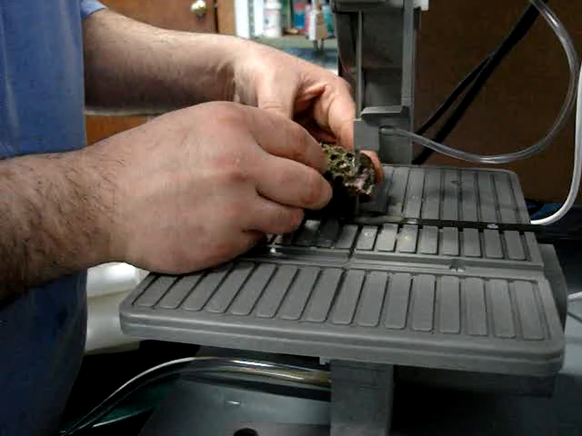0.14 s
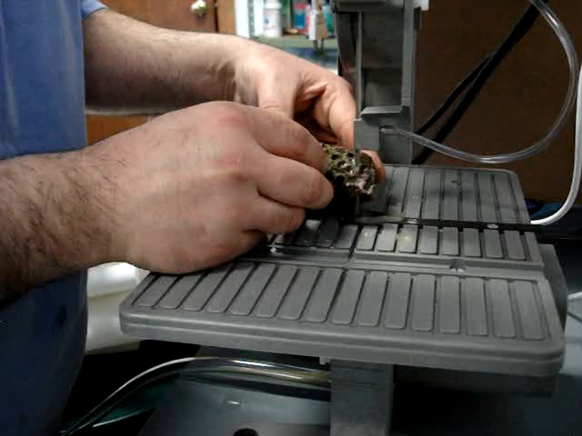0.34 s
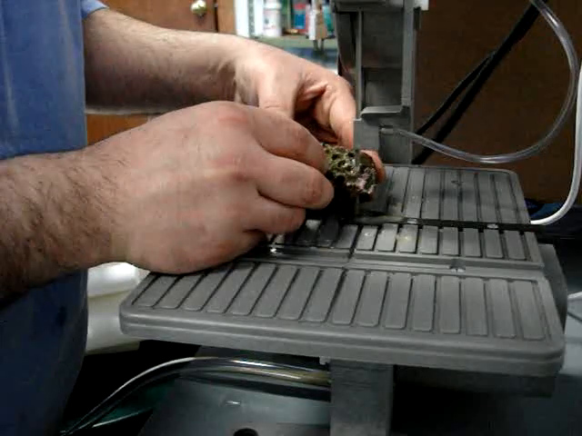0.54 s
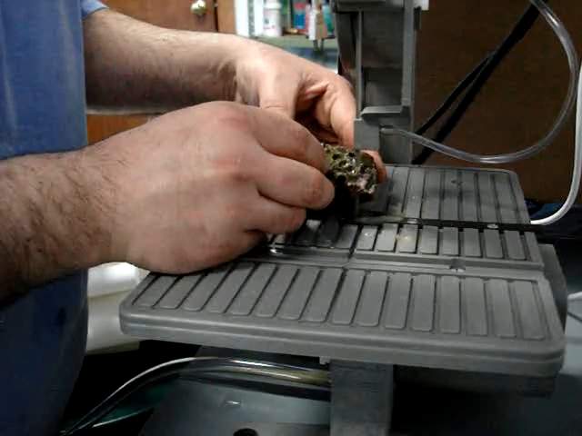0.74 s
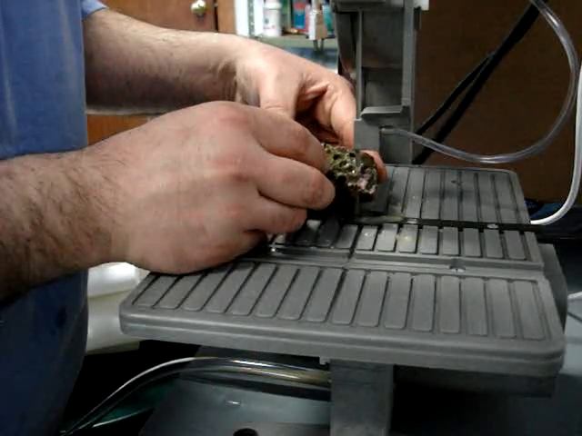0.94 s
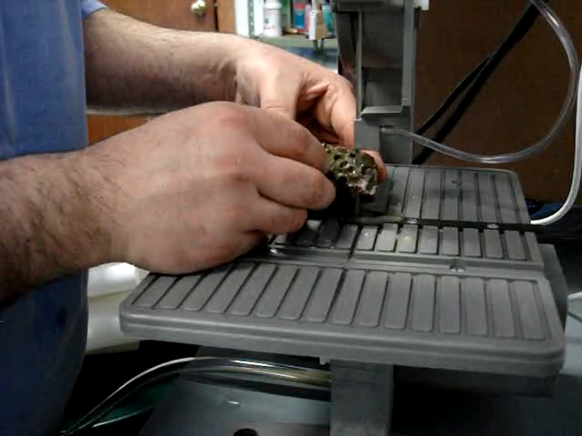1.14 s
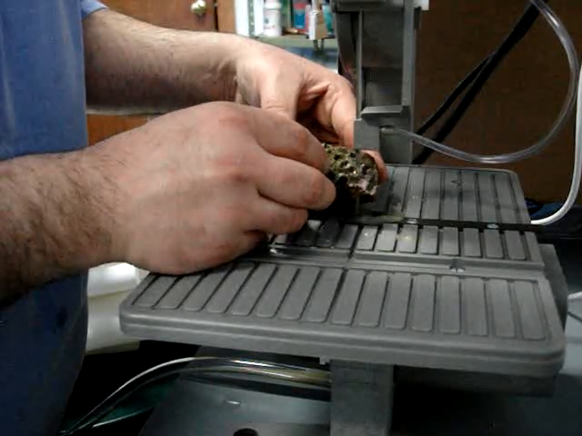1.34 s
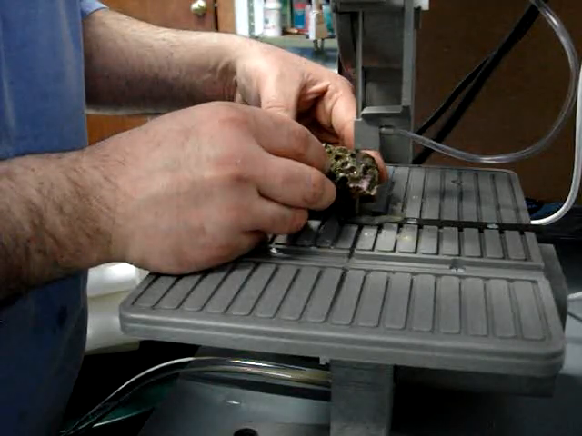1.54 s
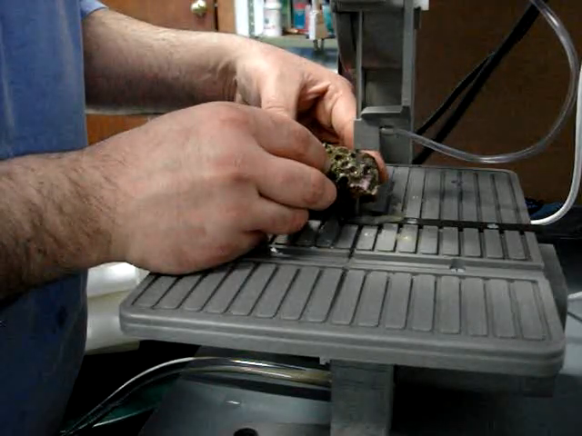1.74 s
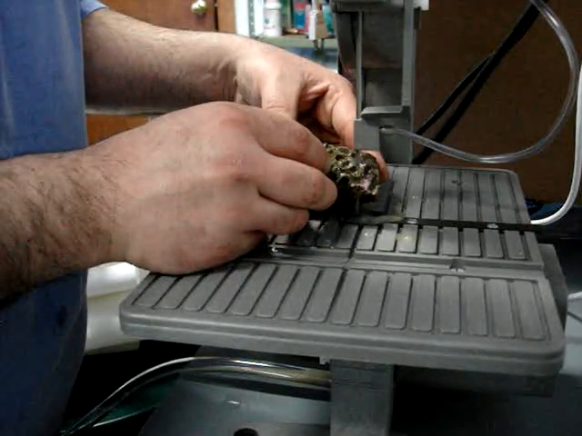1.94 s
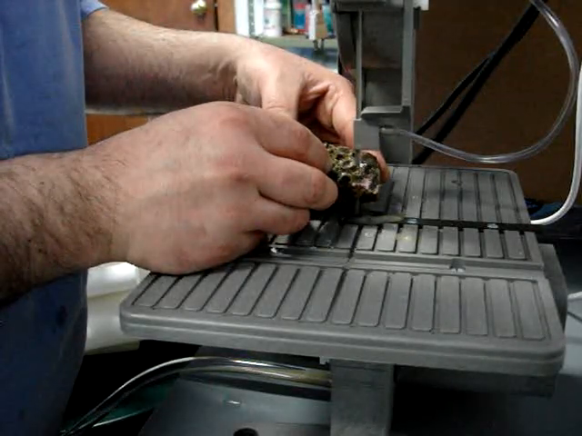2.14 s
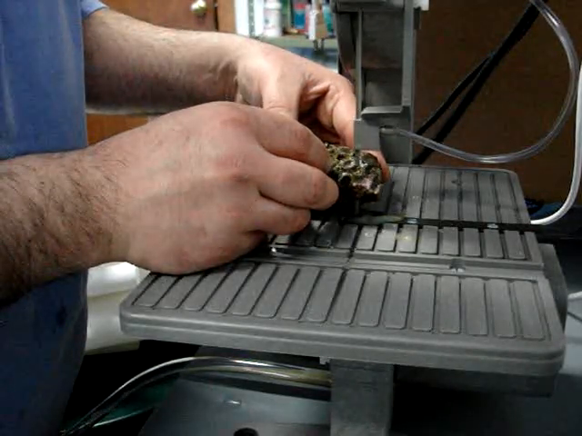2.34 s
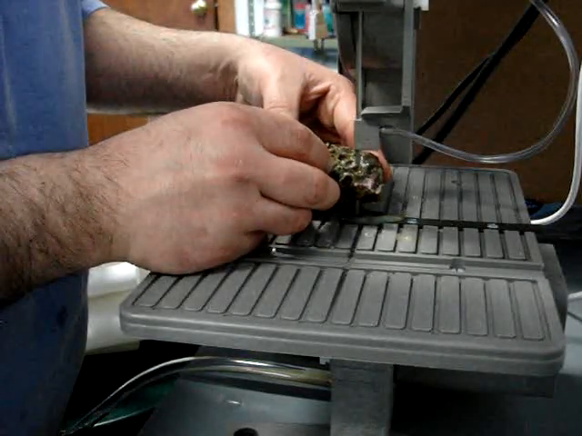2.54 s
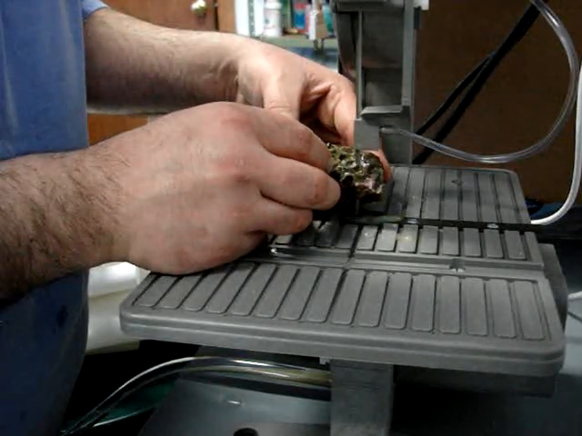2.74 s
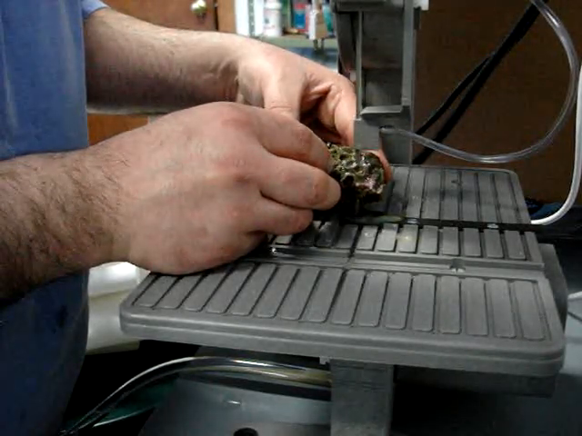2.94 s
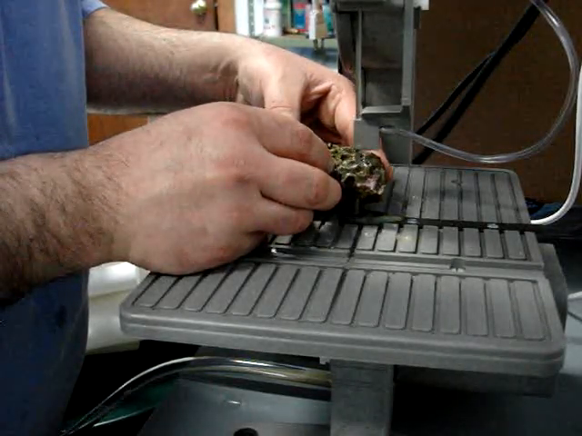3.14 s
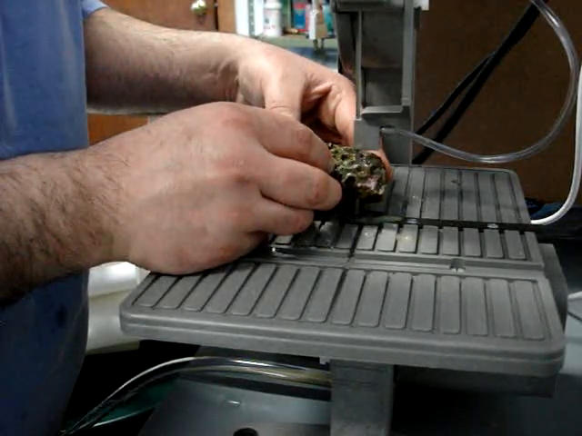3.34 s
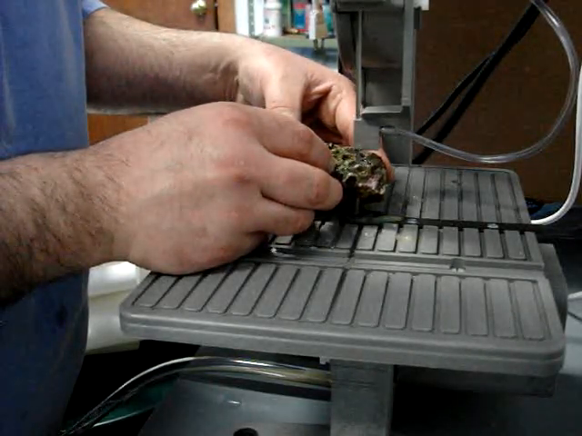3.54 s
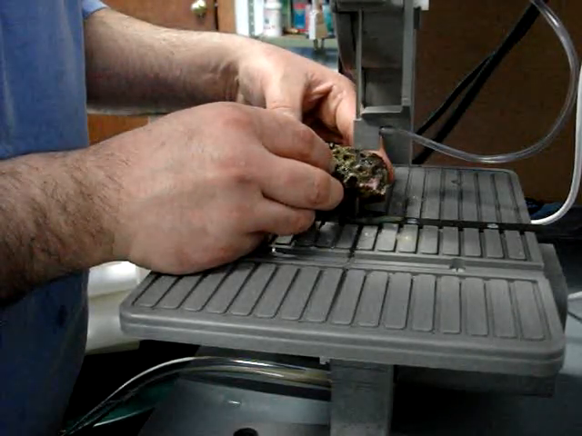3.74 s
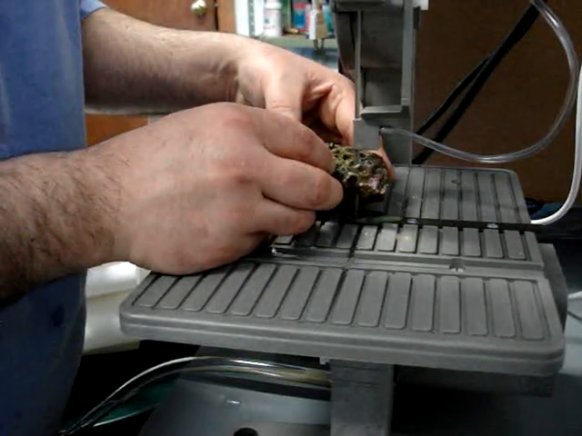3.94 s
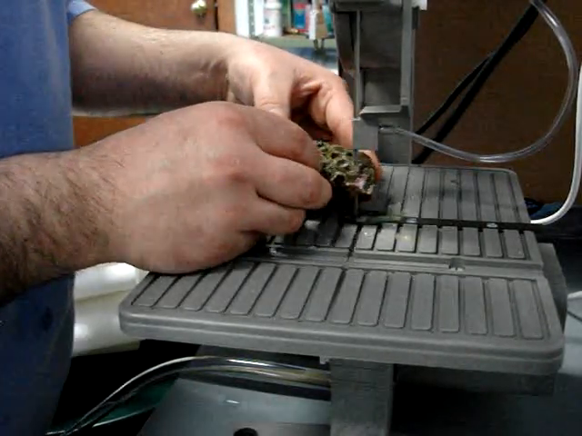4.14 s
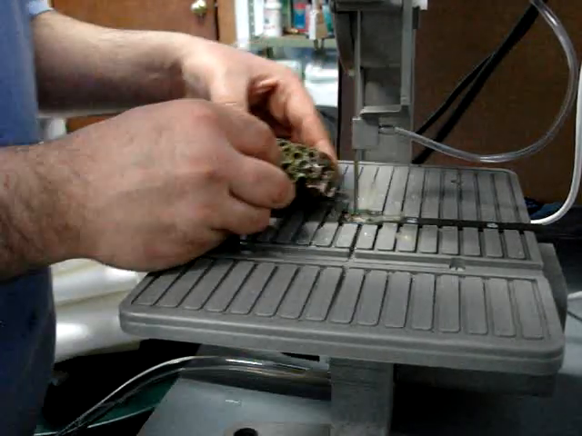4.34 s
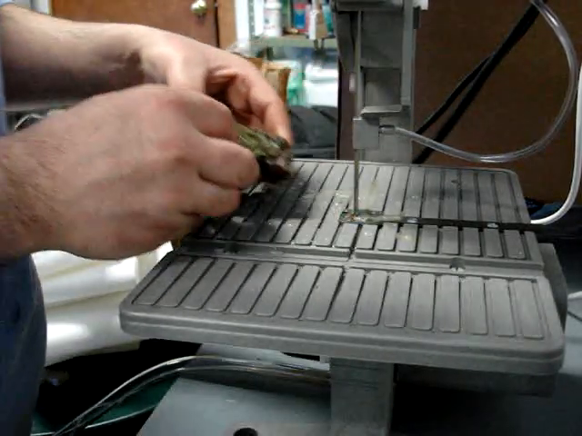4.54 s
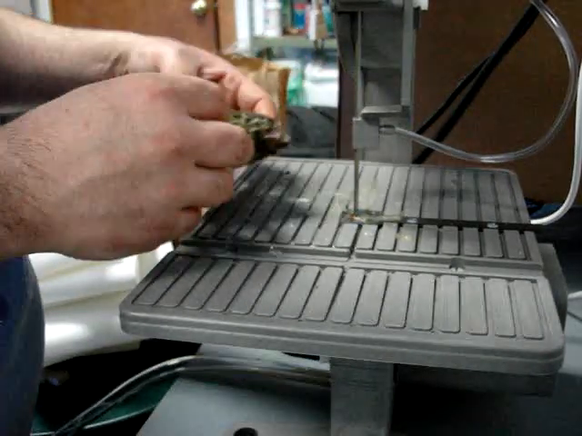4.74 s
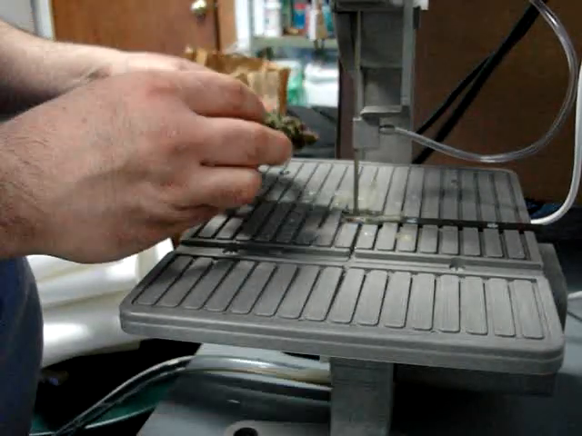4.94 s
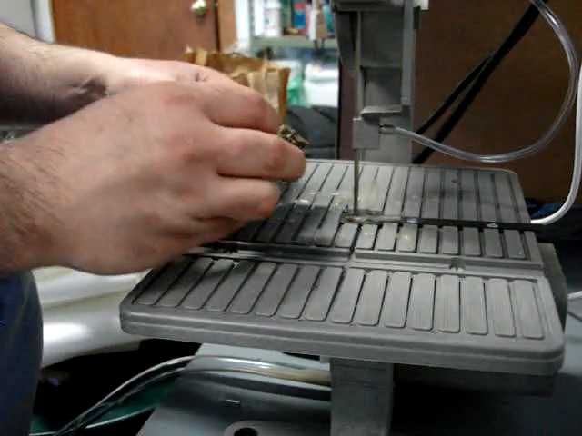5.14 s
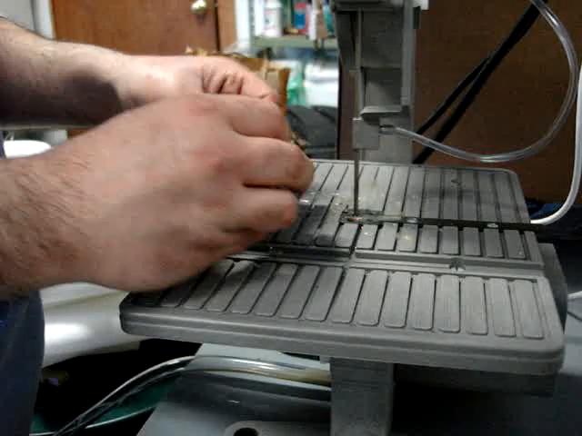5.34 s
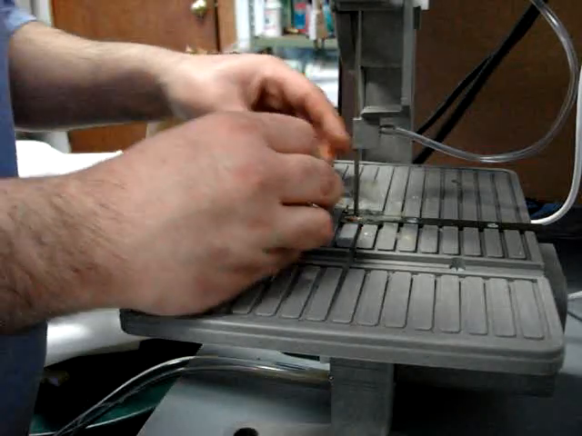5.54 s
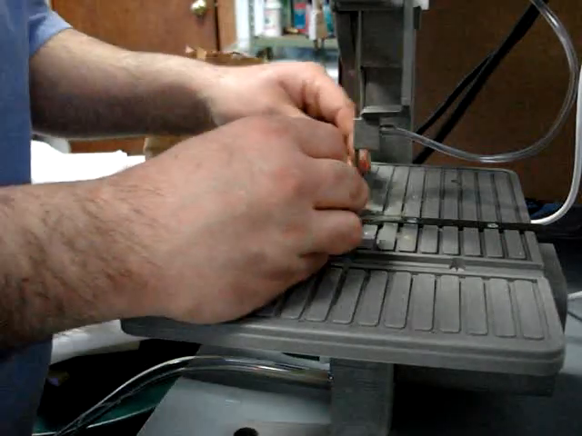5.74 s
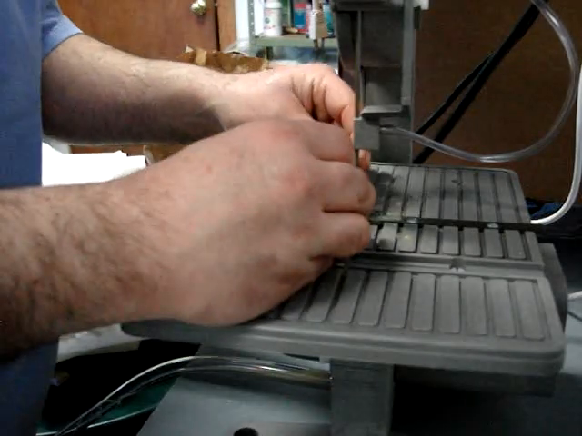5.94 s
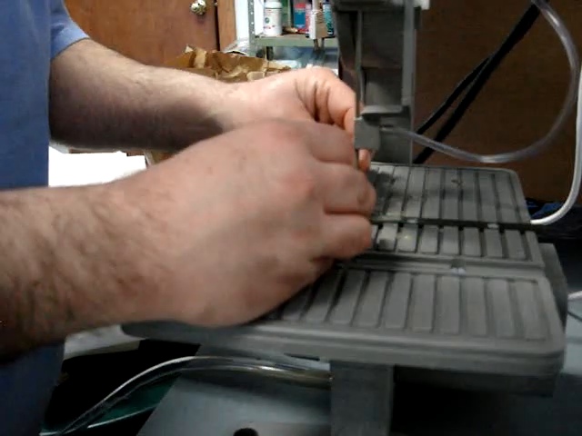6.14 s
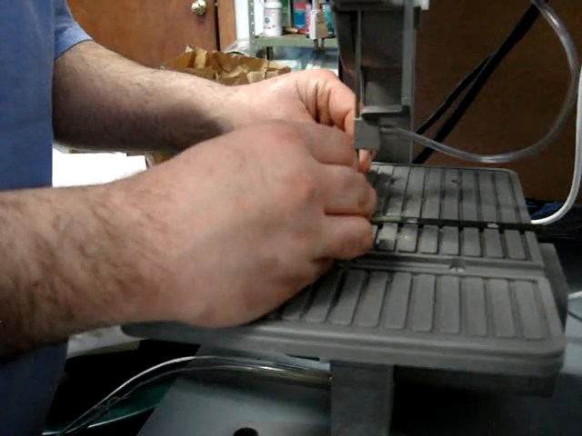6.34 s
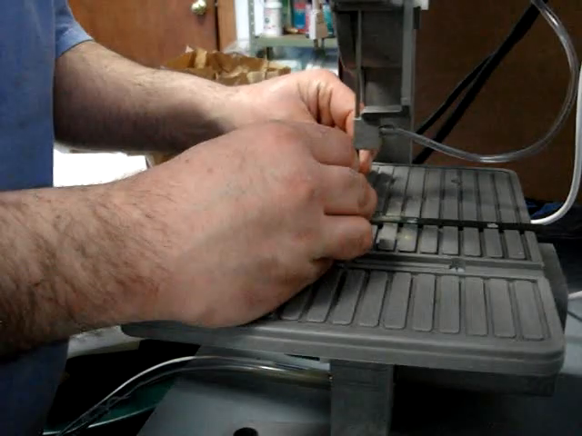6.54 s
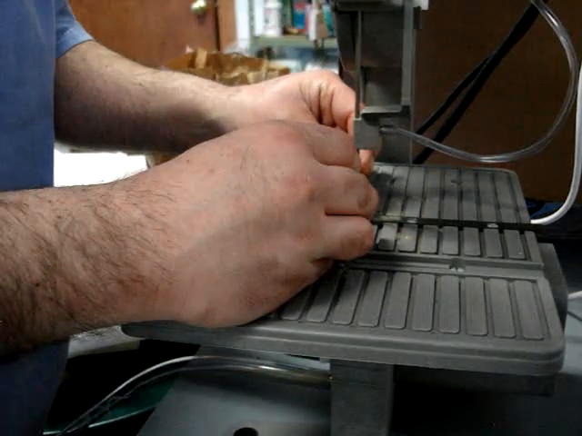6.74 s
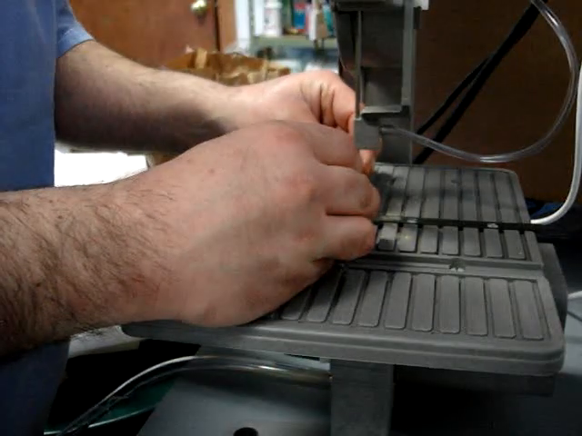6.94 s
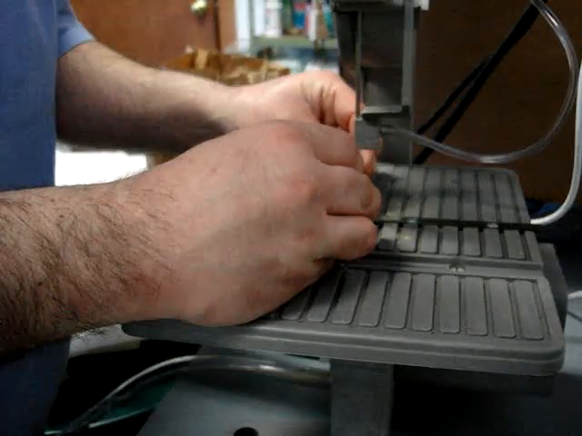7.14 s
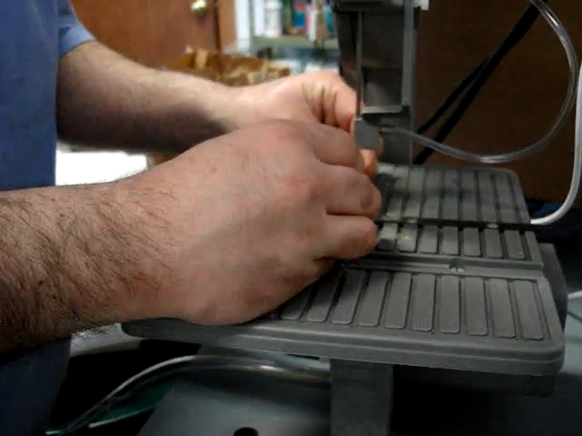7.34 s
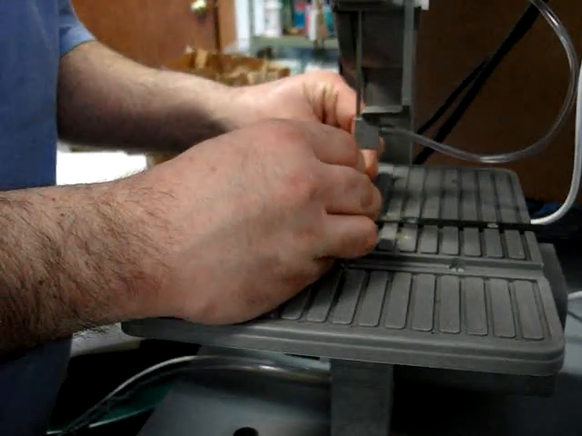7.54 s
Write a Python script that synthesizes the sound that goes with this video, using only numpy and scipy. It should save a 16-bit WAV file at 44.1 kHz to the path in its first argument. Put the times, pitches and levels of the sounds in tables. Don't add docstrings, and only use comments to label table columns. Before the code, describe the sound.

From the start a small band saw is already cutting coral: a dense, harsh, gritty grinding with ringing metallic colour, brightening from about 1 to 2.6 seconds and surging near 2.2. Under it are a subdued motor hum, a dull knock about nine times a second, strongest near 1.7, and low overload bumps. At about 4.0 the piece draws back; the grinding breaks into rapid, fading grazes with tiny high squeals until roughly 4.4. The motor then swells, reaching full strength by 5.5 to 5.9, a steady hollow whirr with wavering singing panels and no cutting. At about 6.45 the second cut begins, duller and quieter, the motor dropping sharply; a thin, unsteady whistle peaks near 6.8. Grinding jumps louder near 7.15 and continues to the end at 7.6. Close indoor camera microphone, overloaded, with rough, limited treble.

```python
import sys
import numpy as np
from scipy import signal
from scipy.fft import rfft, irfft, next_fast_len
from scipy.io import wavfile
from scipy.ndimage import uniform_filter1d

SR = 44100
rng = np.random.default_rng(int(sys.argv[2]) if len(sys.argv) > 2 else 0)


def put_to_file(sound):
    columns = np.atleast_2d(sound).T
    safe = np.clip(columns, -1, 1)
    whole_steps = np.round(safe * 32767)
    wavfile.write(sys.argv[1], SR, whole_steps.astype(np.int16))


def makeup_ratio(level_db):
    decades = np.asarray(level_db, float) / 20
    return 10 ** decades


N = 334719


def evened(x):
    return x / np.sqrt(np.mean(x ** 2) + 1e-20)


def column(rows, k, t):
    return np.interp(t, [row[0] for row in rows], [row[k] for row in rows])


def read(points, hz):
    f, value = np.transpose(points)
    return np.interp(np.log(hz + 1), np.log(f + 1), value)


def wander(top_hz):
    count = next_fast_len(N // 64 + 1)
    hz = np.fft.rfftfreq(count, 64 / SR)
    shape = (hz > 2) / np.sqrt(hz + 2) / (1 + (hz / top_hz) ** 4)
    slow = irfft(rfft(rng.standard_normal(count)) * shape, count)
    return evened(np.interp(np.arange(N) / 64, np.arange(count), slow))


def body(x, spectrum, base_db, modes):
    hz = np.fft.rfftfreq(N, 1 / SR)
    power = makeup_ratio(2 * (read(spectrum, hz) + base_db)) if spectrum else 0
    for f, width, db in modes:
        power = power + makeup_ratio(2 * db) / (1 + (2 * (hz - f) / width) ** 2) ** 1.58
    return irfft(rfft(x) * np.sqrt(power), N)


def strike(rows, shape):
    train = np.zeros(N)
    s, db = np.transpose(rows)
    train[(s * SR).astype(int)] = makeup_ratio(db)
    return signal.oaconvolve(train, shape)[:N]


# [f/Hz, level/dB per Hz]
GRIT = [(530, -44.5), (900, -13.5), (1110, -11.5), (1310, -10.5), (1700, -3), (2060, -10), (2600, -5),
        (3120, -6), (4410, -1), (8950, -3), (10100, -4), (13100, -49), (22000, -120)]
# [f/Hz, width/Hz, level/dB]
BLADE = [(520, 126, -11), (935, 25, -13), (1276, 30, -3), (1337, 36, -1), (1344, 19, 0.5), (1452, 60, -4.5),
         (1700, 90, 0), (2633, 96, -3.5), (2830, 46, -3.5), (2980, 19, -3.5), (2960, 22, -7),
         (3677, 71, -2), (4020, 72, -0.5), (4400, 140, -0.5), (4680, 29, 1), (4985, 270, -3.5),
         (5660, 40, 1.5), (5690, 28, 0.5), (6810, 110, -7.5), (1690, 23, -11), (3840, 22, -5.5),
         (6740, 42, 0.5), (7350, 92, -9), (8810, 330, -7.5)]
# [f/Hz, width/Hz, level/dB]
BLADE_HIGH = [(420, 58, -9), (807, 31, -4.5), (1313, 42, 0), (1400, 31, -4), (1730, 63, 4), (1960, 44, -3),
              (2450, 54, -7), (3260, 80, -6), (3840, 48, 2), (4240, 84, -7.5), (4730, 89, 2), (5250, 30, 3),
              (6000, 170, -0.5), (6100, 39, 0)]
# [t/s, grinding level/dB]
FEED = [(0, -24.5), (.16, -29), (.8, -25.5), (1.5, -26), (1.85, -28), (2.22, -21.5), (2.4, -24),
        (2.58, -23), (3.05, -23.5), (3.36, -27), (3.52, -25), (4.0, -23), (6.5, -31.5), (6.85, -31),
        (6.98, -28), (7.12, -31.5), (7.17, -22.5), (7.3, -24.5)]
# [start t/s, end t/s, level/dB against the feed]
CONTACT = [
    (-1, 4.02, 0),
    (4.0, 4.052, -4),
    (4.05, 4.085, -5.5),
    (4.09, 4.118, -8),
    (4.11, 4.233, -8.5),
    (4.235, 4.284, -6.5),
    (4.272, 4.345, -6),
    (4.33, 4.362, -13),
    (4.366, 4.42, -19),
    (6.44, 9, 0),
]
FREE_S = (5.2, 6.42)
# [t/s, treble tilt level/dB per octave]
HARDNESS = [(0, -1.2), (.65, -0.7), (1.15, 3), (2.1, 3), (2.65, -1.6), (3.9, 0.5), (6.5, -4), (6.9, -2.2),
            (7.2, -0.3)]
# [frame ring level/dB, coral body level/dB, fizz level/dB]
CUT_COLOUR = [
    (-3, -2, -2),
    (-1.5, -2.5, -4),
]
CUT_BANDS_HZ = (1450, 2610, 4840, 8380)
FEED_MID_DB, MOTOR_UNDER_DB, MOST_DB = -25, -17, 11
RING_FOLLOWS, CORAL_FOLLOWS, FIZZ_PER_DB = 0.95, 0.59, -0.82
PIVOT_HZ = 5030
TOUCH_S, LEAVE_S = .006, .01


def grinding(t, turns):
    impacts = rng.standard_normal(N) * makeup_ratio(.8 * np.minimum(rng.exponential(1, N), 5))
    bite_db = 0.21 * np.cos(4 * np.pi * turns) + 0.69 * np.cos(12 * np.pi * turns)
    bites = impacts * makeup_ratio(bite_db + 0.5 * wander(top_hz=64.0))
    first = t < np.mean(FREE_S)
    rung = np.where(first, body(bites, GRIT, -4.5, BLADE), body(bites, GRIT, -2.2, BLADE_HIGH))

    hz, s, z = signal.stft(rung, SR, nperseg=256, noverlap=192)
    z /= np.sqrt(np.mean(abs(z[(hz > 3500) & (hz < 6500)]) ** 2) * 40)
    patches = evened(uniform_filter1d(uniform_filter1d(rng.standard_normal(z.shape), 3, 0), 120, 1))
    flecks = evened(uniform_filter1d(uniform_filter1d(rng.standard_normal(z.shape), 14, 0), 5, 1))

    feed_db = column(FEED, 1, s)
    gained_db = np.minimum(column(MOTOR, 1, s) - feed_db - MOTOR_UNDER_DB, MOST_DB)
    ring, coral, fizz = np.array(CUT_COLOUR)[(s > np.mean(FREE_S)).astype(int)].T
    ring = ring + RING_FOLLOWS * gained_db
    coral = coral + CORAL_FOLLOWS * gained_db
    fizz = fizz + FIZZ_PER_DB * (feed_db - FEED_MID_DB)
    tilt = np.array([ring, coral, 0 * s, fizz])
    weights = np.array([np.interp(np.log(hz + 1), np.log(CUT_BANDS_HZ), row) for row in np.eye(4)])
    octaves = np.clip(np.log2((hz + 1) / PIVOT_HZ), -.6, .6)
    colour_db = weights.T @ tilt + np.outer(octaves, column(HARDNESS, 1, s))
    z *= makeup_ratio(colour_db + 0.7 * patches + 1.2 * flecks * hz[:, None] / 8000)

    touches = []
    for start, end, db in CONTACT:
        ramp = np.minimum((t - start) / TOUCH_S, (end - t) / LEAVE_S)
        touches.append(makeup_ratio(db) * np.clip(ramp, 0, 1))
    ground = signal.istft(z, SR, nperseg=256, noverlap=192)[1][:N]
    return np.max(touches, 0) * makeup_ratio(column(FEED, 1, t)) * ground


# [start t/s, end t/s, level/dB]
SQUEAL = [
    (4.234, 4.276, -28.5),
    (4.277, 4.328, -28.5),
    (4.318, 4.344, -25.5),
]
# [f/Hz, width/Hz, level/dB]
SQUEAL_MODES = [(4600, 86, -3.5), (8550, 280, -1.5), (9560, 300, -4), (3400, 1000, -9.5)]


def squeal(t):
    touch = np.zeros(N)
    for start, end, db in SQUEAL:
        touch += makeup_ratio(db) * np.clip(np.minimum((t - start) / 0.008, (end - t) / 0.014), 0, 1)
    hz = SQUEAL_MODES[0][0] + 40. * wander(top_hz=80)
    song = makeup_ratio(-1.5 + 2.2 * wander(top_hz=120)) * np.sin(2 * np.pi * np.cumsum(hz) / SR)
    hiss = evened(body(rng.standard_normal(N), None, 0, SQUEAL_MODES))
    return touch * (song + .8 * hiss)


# [t/s, turns completed]
WHEEL = [(0, -.16), (.761, 7), (1.883, 17), (2.751, 25), (3.383, 31), (4.108, 38), (4.6, 42.8), (6.5, 61.7),
         (7.6, 73.4)]


def at_turns(turns):
    s, made = np.transpose(WHEEL)
    return np.interp(turns, made, s)


KNOCK_TURNS = (4, 38)
KNOCK_LAG_S, KNOCK_DB, KNOCK_SPREAD_DB = .018, -20, 3
HARDEST_S, KNOCK_FALLS_DB_PER_S = 1.7, 5.5


def weld():
    u = np.arange(1500) / SR
    knock = np.sin(2 * np.pi * 1320 * u) * np.exp(-u / 0.0046)
    knock += .5 * np.sin(2 * np.pi * 1700 * u) * np.exp(-u / 0.003)
    s = at_turns(np.arange(*KNOCK_TURNS)) + KNOCK_LAG_S
    db = KNOCK_DB - KNOCK_FALLS_DB_PER_S * abs(s - HARDEST_S)
    db = db + KNOCK_SPREAD_DB * rng.standard_normal(len(s))
    return makeup_ratio(-8.0) * strike(np.transpose([s, db]), knock * np.minimum(u / 0.0025, 1))


# [t/s, level/dB]
MOTOR = [(0.0, -42.5), (0.25, -46), (1.0, -42.5), (2.0, -42), (2.4, -39.5), (3.0, -42), (3.7, -40),
         (4.1, -36.5), (4.35, -41), (4.7, -34), (5.1, -27.5), (5.5, -25), (5.9, -23.5), (6.5, -23.5),
         (6.7, -33), (6.9, -35), (7.2, -33.5), (7.59, -38.5)]
# [f/Hz, level/dB per Hz]
FRAME = [(24, -75), (40, -51.5), (176, -25), (361, -16.5), (560, -11.5), (689, -4.5), (1090, -17.5),
         (1320, -11), (1590, -12.5), (1740, -13.5), (2090, -15.5), (5800, -19.5), (10100, -29),
         (13100, -70), (22000, -120)]
# [f/Hz, width/Hz, level/dB]
PANELS = [(212, 19, -28.5), (263, 5.2, -31.5), (322, 11, -15), (388, 45, -13.5), (427, 18, -12),
          (461, 24, -9.5), (658, 5.1, -15.5), (689.4, 11.6, -0.5), (790, 4.5, 0.5), (895, 27, -8.5),
          (959, 22, -4), (1029, 18, -9.5), (1172, 14, -9), (1233, 59, -2), (1360, 60, -5), (1470, 10, -5),
          (1740, 135, -8), (1785, 18, -11.5), (1930, 91, -7.5), (2474, 29, -13), (2520, 32, -9),
          (3240, 50, -18), (3360, 33, -12), (4575, 150, -16), (5860, 350, -23)]
# [f/Hz, level/dB against the motor]
HUM = [(120, -32.5), (149.5, -32), (240, -27.5), (360.5, -17)]
SHAFT_PER_WHEEL = 2.5
SHAFT_ORDERS, SHAFT_DB = 40, -7.5
OPEN_DB = -24
TREBLE_DB, TREBLE_PER_DB = -0.83, -.25
LOADED_TREBLE_DB = -0.5


def motor(t, turns):
    shaft = SHAFT_PER_WHEEL * turns + 0.0081 * wander(top_hz=6.1)
    starts = rng.random(SHAFT_ORDERS)
    orders = evened(sum(np.cos(2 * np.pi * ((k + 3) * shaft + start)) for k, start in enumerate(starts)))
    throb_db = 0.45 * np.cos(2 * np.pi * turns) + 1.1 * wander(top_hz=40)
    share = np.sqrt(2 * 1000 / SR)
    drive = rng.standard_normal(N) * makeup_ratio(throb_db) + makeup_ratio(SHAFT_DB) * share * orders
    shell = body(drive, FRAME, -1.0, PANELS)

    hz = np.fft.rfftfreq(N, 1 / SR)
    low = irfft(rfft(shell) * (hz > 300) * (hz < 1000), N)
    treble = irfft(rfft(shell) / np.sqrt(1 + (2500 / (hz + 1)) ** 4), N)
    motor_db = column(MOTOR, 1, t)
    free_db = TREBLE_DB + TREBLE_PER_DB * (motor_db - OPEN_DB)
    treble_db = np.where(t < SQUEAL[-1][1], LOADED_TREBLE_DB, free_db)
    shell = (shell + (makeup_ratio(treble_db) - 1) * treble) / low.std()

    hum = np.zeros(N)
    for f, db in HUM:
        wave = np.sqrt(2) * np.sin(2 * np.pi * (f * t + rng.random()))
        hum += makeup_ratio(db + 0.83 * wander(top_hz=3.4)) * wave
    return makeup_ratio(motor_db) * (shell + hum)


def tone(hz, db):
    hz = hz + 3.7 * wander(top_hz=25.1)
    return makeup_ratio(db - 4 + 1.9 * wander(top_hz=25)) * np.sqrt(2) * np.sin(2 * np.pi * np.cumsum(hz) / SR)


# [t/s, level/dB]
LOW_SWELLS = [(.1, -42), (.55, -44.5), (2.9, -38.5), (4.14, -41), (4.7, -33), (4.78, -29), (4.87, -26.5),
              (5.07, -23), (5.27, -24), (5.475, -21), (5.72, -29.5), (6.42, -28.5)]
# [t/s, f/Hz]
HIGH_PITCH = [(0, 1700), (2.4, 1700), (5, 1731), (6.1, 1740), (6.9, 1745), (7.59, 1712)]
# [t/s, f/Hz, level/dB]
WHISTLE = [(6.45, 3840, -69.5), (6.55, 3810, -44), (6.72, 3750, -40), (6.8, 3840, -33), (7, 3770, -46),
           (7.2, 3720, -43), (7.35, 3700, -73)]
LOW_HZ, LOW_DB, LOW_FOLLOWS = 699, -27, 1.24
HIGH_DB, HIGH_FOLLOWS = -33, 0.9
SWELL_S = 0.023
HELD_DB = -5


def panel_tones(t):
    open_db = column(MOTOR, 1, t) - OPEN_DB
    swells = sum(makeup_ratio(db) * np.exp(-.5 * ((t - s) / SWELL_S) ** 2) for s, db in LOW_SWELLS)
    held_db = HELD_DB * np.clip((t - FREE_S[1]) / .4, 0, 1)
    low = (makeup_ratio(LOW_DB + LOW_FOLLOWS * open_db + held_db) + swells) * tone(LOW_HZ, 0)
    high = tone(column(HIGH_PITCH, 1, t), HIGH_DB + HIGH_FOLLOWS * open_db)
    return low + high + tone(column(WHISTLE, 1, t), column(WHISTLE, 2, t))


# [f/Hz, width/Hz, depth level/dB]
NOTCHES = [(564, 102, -5), (1160, 79, -1.5), (1223, 25, -10), (1956, 100, -2.5), (2797, 38, -8.5),
           (3360, 84, -0.5)]


def scene():
    t = np.arange(N) / SR
    turns = column(WHEEL, 1, t)
    direct = grinding(t, turns) + squeal(t) + weld() + motor(t, turns) + panel_tones(t)
    hz = np.fft.rfftfreq(N, 1 / SR)
    notch_db = sum(db * np.exp(-.5 * ((hz - f) / (width / 2)) ** 2) for f, width, db in NOTCHES)
    return np.tile(irfft(rfft(direct) * makeup_ratio(notch_db), N), (2, 1))


# [t/s, depth level/dB]
HARD_JOLTS = [(.085, -43), (.217, -45), (.235, -41), (.989, -44), (1.208, -39), (1.431, -46.5),
              (1.656, -42), (1.768, -50), (2.026, -42), (2.624, -44), (2.734, -46), (2.961, -46),
              (3.227, -44), (3.383, -38), (4.108, -50), (4.273, -43), (4.3, -42), (4.334, -60)]
JOLT_DB, HALF_JOLT_DB, JOLT_SPREAD_DB = -48.5, -52, 4.5


def jolts():
    halves = np.arange(2, 2 * KNOCK_TURNS[1])
    db = np.where(halves % 2, HALF_JOLT_DB, JOLT_DB) + JOLT_SPREAD_DB * rng.standard_normal(len(halves))
    return np.vstack([np.transpose([at_turns(halves / 2), db]), HARD_JOLTS])


def starved(x, frame, share, top_share):
    hz, s, z = signal.stft(x, SR, nperseg=frame, noverlap=frame * 3 // 4)
    edges_hz = [5040, 5470, 5940, 6460, 7020, 7580, 8270, 8960, 9650, 11000]
    odds = np.geomspace(share, top_share, len(edges_hz) - 1)
    empty = rng.random((len(s) // 5 + 1, len(odds))) < odds
    band = np.searchsorted(edges_hz, hz) - 1
    inside = (band >= 0) & (band < len(odds))
    hole = np.repeat(empty, 5, 0)[:len(s), np.clip(band, 0, len(odds) - 1)].T * inside[:, None]
    return signal.istft(z * (1 - hole), SR, nperseg=frame, noverlap=frame * 3 // 4)[1][:N]


# [lower edge f/Hz, step level/dB against the band]
COARSE = [(3800, -7.5), (4480, -0.5), (5510, 1), (6550, 1.14), (7920, 1), (9300, 5.5)]
EDGE_HZ = 10022


def coarse(x, hop=160):
    n, k = np.arange(2 * hop), np.arange(hop)
    window = np.sin(np.pi * (n + .5) / (2 * hop))[:, None]
    basis = window * np.cos(np.pi / hop * np.outer(n + .5 + hop / 2, k + .5))
    count = N // hop + 2
    padded = np.pad(x, (hop, 3 * hop))
    lines = padded[np.arange(count)[:, None] * hop + n] @ basis
    edges = [int(hz * 2 * hop / SR) for hz, db in COARSE] + [int(EDGE_HZ * 2 * hop / SR) + 2]
    hunger_db = 4.5 * rng.standard_normal(count)
    luck_db = 1.5 * rng.standard_normal((count, len(COARSE)))
    for band, (lo, hi) in enumerate(zip(edges, edges[1:])):
        part = lines[:, lo:hi]
        level = np.sqrt(uniform_filter1d((part ** 2).mean(1), size=24) + 1e-12)
        step = (level * makeup_ratio(COARSE[band][1] + hunger_db + luck_db[:, band]))[:, None]
        lines[:, lo:hi] = step * np.sign(part) * np.floor(abs(part) / step + 0.42)
    blocks = lines @ basis.T * 2 / hop
    return (blocks[1:, :hop] + blocks[:-1, hop:]).ravel()[:N]


def band_limit(x):
    return signal.sosfilt(signal.butter(12, 11090, fs=SR, output="sos"), x)


TREMORS_PER_S, TREMOR_DB = 59, -58.5


def record(dry):
    u = np.arange(-400, 1200) / SR
    dent = np.exp(-.5 * (u / np.where(u < 0, .0019, .004)) ** 2)
    tremor_size = np.interp(np.arange(N) / SR, [2.1, 3.6, 4.42, 4.5, 5.6, 6.5, 6.8],
                            [1.3, .5, 0.67, .1, .3, 1.6, .4])
    tremors = (rng.random(N) < TREMORS_PER_S / SR) * rng.exponential(1, N) * tremor_size
    rows = jolts()
    dents = strike(rows, dent) + makeup_ratio(TREMOR_DB) * signal.oaconvolve(tremors, dent)[:N]
    dents = np.roll(dents, -400)
    duck = np.roll(strike(rows, np.exp(-np.arange(1600) / SR / 0.0081)), -60)
    ducked = dry[0] * makeup_ratio(-500 * uniform_filter1d(duck, 60))
    rumble = signal.lfilter(*signal.butter(2, 90 / (SR / 2)), dry[0] ** 2) * makeup_ratio(-16)
    push = signal.lfilter(*signal.butter(1, 9 / (SR / 2), "high"), 0.71 * dents + rumble)
    x = coarse(starved(ducked - push, 768, .007, 0.015))
    x = signal.oaconvolve(x, signal.firwin(801, EDGE_HZ, window=("kaiser", 9), fs=SR), "same")
    return band_limit(np.tile(x, (2, 1)))


dry = scene()
out = record(dry)
put_to_file(out)
```